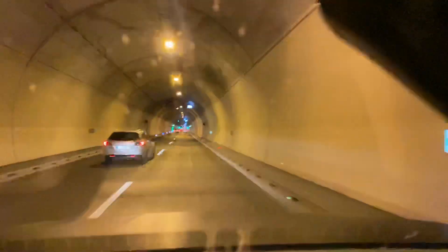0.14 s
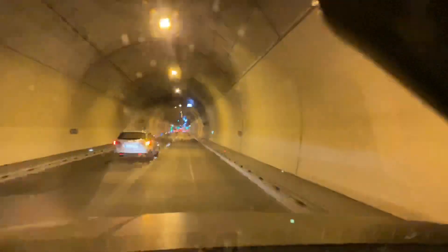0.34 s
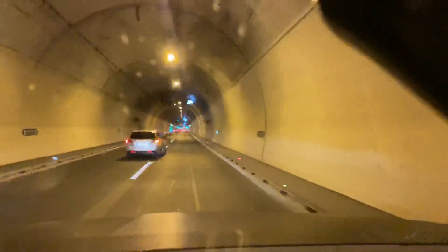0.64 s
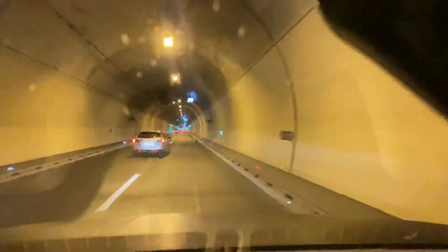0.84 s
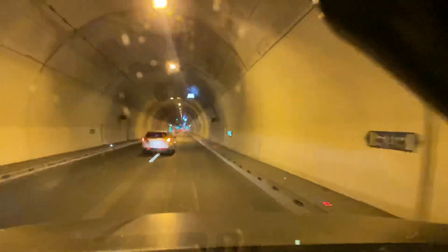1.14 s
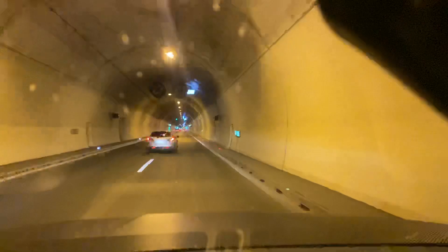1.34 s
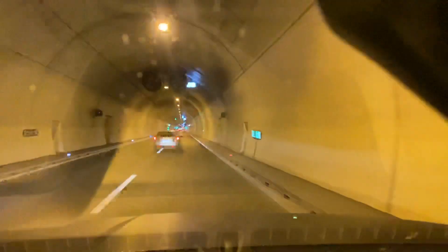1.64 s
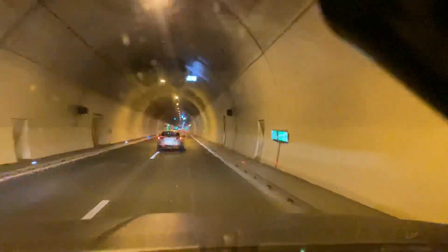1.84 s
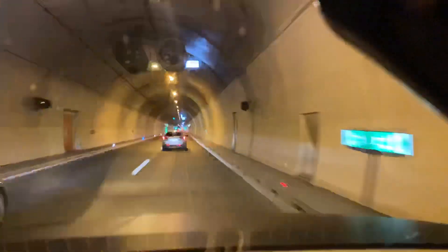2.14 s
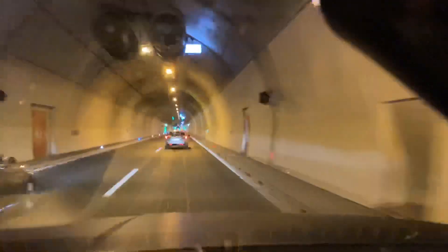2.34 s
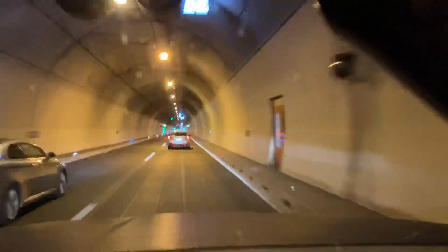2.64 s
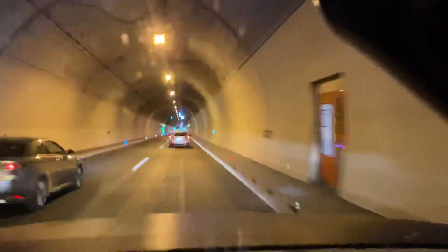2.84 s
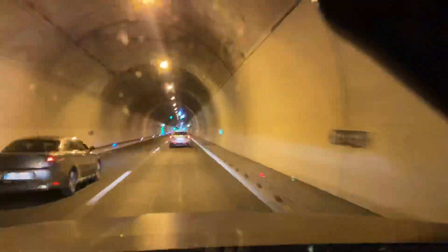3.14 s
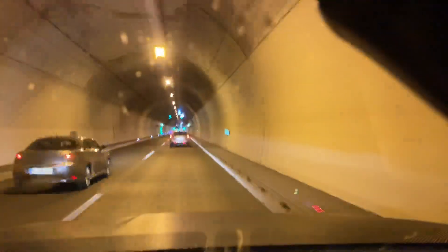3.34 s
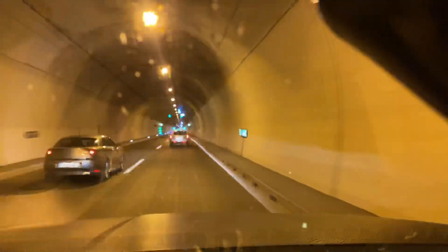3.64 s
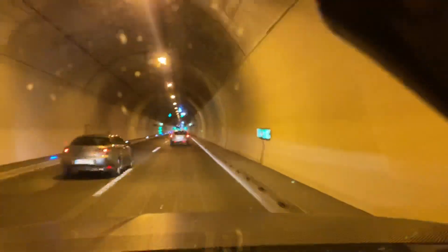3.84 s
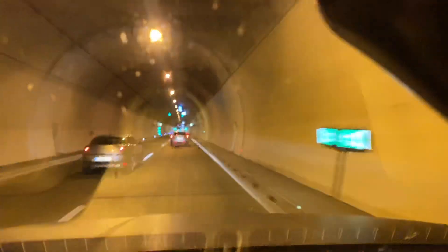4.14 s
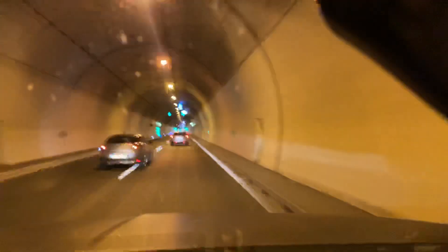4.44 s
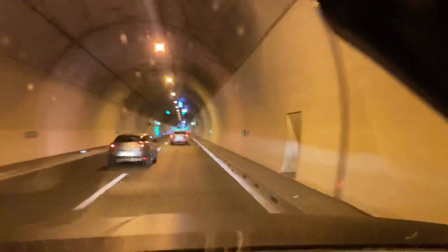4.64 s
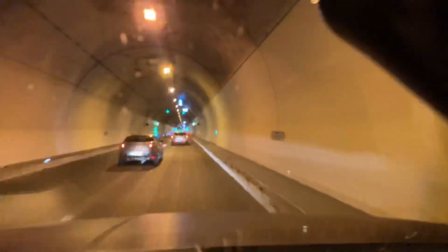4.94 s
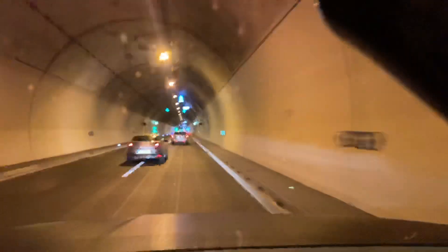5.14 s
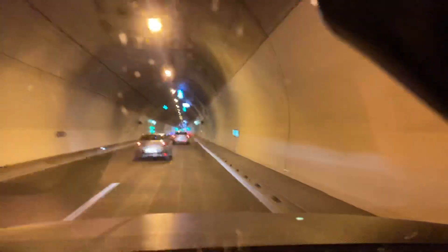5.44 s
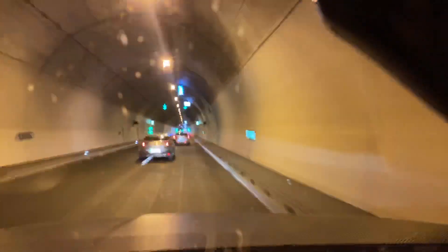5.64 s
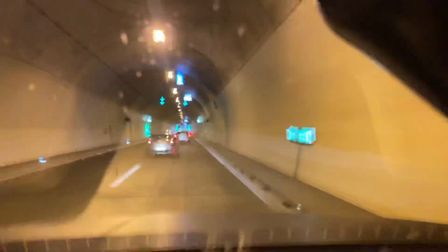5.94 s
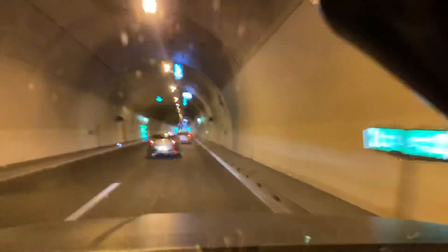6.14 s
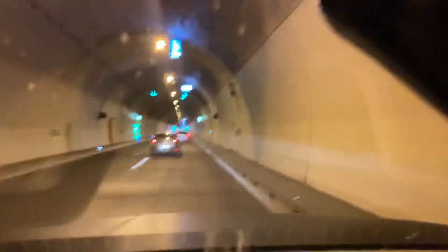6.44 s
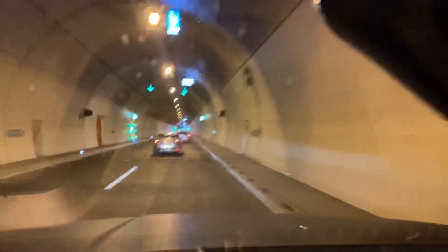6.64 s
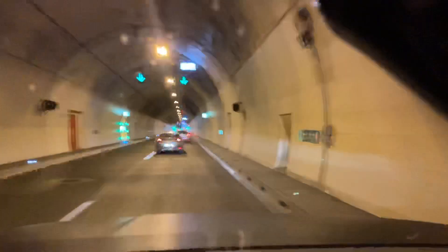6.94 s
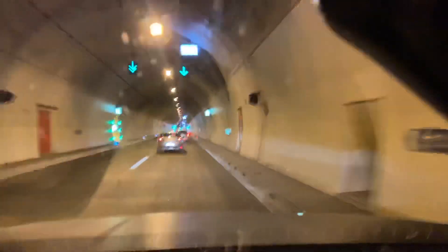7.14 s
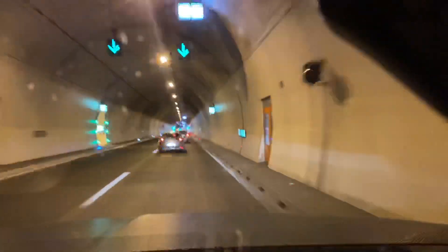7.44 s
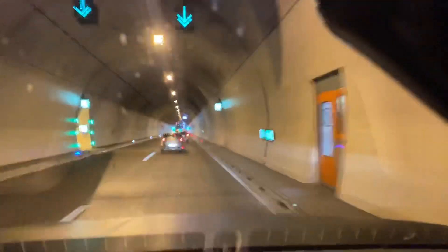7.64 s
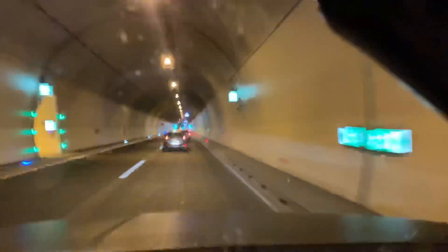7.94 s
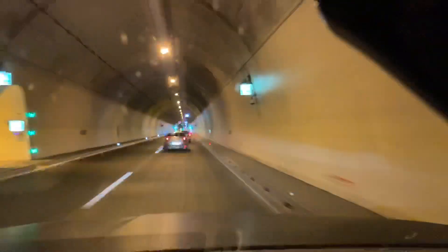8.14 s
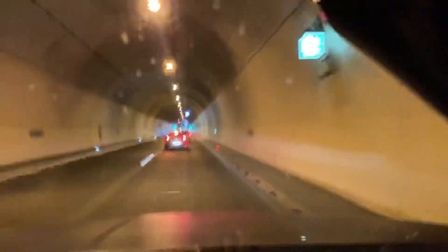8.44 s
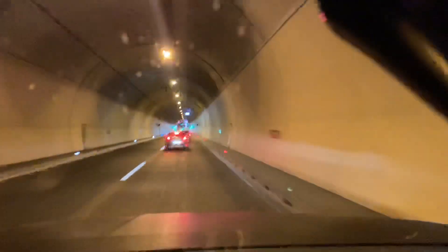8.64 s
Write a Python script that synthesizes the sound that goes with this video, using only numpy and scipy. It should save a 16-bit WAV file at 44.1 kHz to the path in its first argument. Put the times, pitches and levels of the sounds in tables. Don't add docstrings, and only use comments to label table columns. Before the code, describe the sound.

Inside a car in a road tunnel, a low engine drone sinks in pitch and throbs over steady tyre roar, rumble and airy hiss.

```python
import sys
import numpy as np
from scipy import signal
from scipy.fft import rfft, irfft, next_fast_len
from scipy.io import wavfile
from scipy.ndimage import uniform_filter1d, map_coordinates

SR = 44100
rng = np.random.default_rng(int(sys.argv[2]) if len(sys.argv) > 2 else 0)


def to_wav(sig):
    pcm = np.clip(np.atleast_2d(sig), -1, 1) * 32767
    pcm = np.round(pcm).astype(np.int16)
    wavfile.write(sys.argv[1], SR, pcm.T)


def amplitude_ratio(level_db):
    exponent = np.asarray(level_db, float) / 20
    return 10 ** exponent


N = 388521


def unit(x):
    return x / np.sqrt(np.mean(x ** 2) + 1e-20)


def along(points, hz, column=1):
    table = np.transpose(points)
    return np.interp(np.log(hz + 1), np.log(table[0] + 1), table[column])


def curves(rows):
    s, *cols = np.transpose(rows)
    return [np.interp(np.arange(N) / SR, s, c) for c in cols]


def wobble(rate):
    coarse = np.arange(0, N + 32, 32)
    knots = rng.standard_normal(int(N * rate / SR) + 4)
    return np.interp(np.arange(N), coarse, map_coordinates(knots, [coarse * rate / SR]))


def filtered(x, response):
    m = next_fast_len(N + SR // 2)
    return irfft(rfft(x, m) * response(np.fft.rfftfreq(m, 1 / SR)), m)[..., :N]


def rush(gain):
    m = next_fast_len(N)
    hz = np.fft.rfftfreq(m, 1 / SR)
    re, im = rng.standard_normal((2, 2, len(hz)))
    return unit(irfft((re + 1j * im) * gain(hz), m)[:, :N])


def patchy(pair, depth_db, speck_db=0):
    z = signal.stft(pair, nperseg=512)[2]
    grain = rng.standard_normal(z.shape[1:])
    patches = uniform_filter1d(uniform_filter1d(grain, size=4, axis=0), size=9, axis=1)
    specks = uniform_filter1d(grain[::-1], size=4, axis=1)
    gain = amplitude_ratio(depth_db * unit(patches) + speck_db * unit(specks))
    return unit(signal.istft(z * gain, nperseg=512)[1][:, :N])


def tone(hz, db, rough, rate):
    turn = 2 * np.pi * np.cumsum(hz) / SR
    in_phase = (1 + rough * wobble(rate)) * np.sin(turn)
    return amplitude_ratio(db) * unit(in_phase + rough * wobble(rate) * np.cos(turn))


def swells(rows):
    glide_s = .035
    null_share = 0.25
    null_left = 0.11
    s, hz, db = np.transpose(rows)
    t = np.arange(N) / SR
    k = np.clip(np.searchsorted(s, t) - 1, 0, None)
    ahead = np.append(s[1:], N / SR + glide_s)[k]
    half = null_share * (ahead - s[k])
    hump = np.tanh((t - s[k]) / half) * np.tanh((ahead - t) / half)
    hz, db = uniform_filter1d(np.array([hz[k], db[k]]), size=int(glide_s * SR))
    return hz, amplitude_ratio(db) * (null_left + (1 - null_left) * hump)


def spread(x, echo=.4):
    return np.array([x, echo * np.roll(x, SR // 8)])


def cabin(hz, base_db=-5):
    # f/Hz, width/Hz, level/dB
    modes = [(275, 13, -4), (437, 184, 6.5), (498, 110, -2.5), (571, 57, 4), (612, 64, 1), (723, 190, 0.5),
             (867, 134, 2.5), (955, 98, 4), (1064, 78, -2.5), (1214, 115, -4), (1356, 180, -7.5),
             (1600, 84, 2)]
    peaks = sum(amplitude_ratio(2 * db) / (1 + (2 * (hz - c) / w) ** 2) ** 2 for c, w, db in modes)
    return np.sqrt(amplitude_ratio(2 * base_db) + peaks)


def engine(blur_hz=17):
    # t/s, f/Hz, effort level/dB
    revs = [(0, 160, -42), (.7, 157.4, -41), (1.4, 154, -53), (2.2, 152, -43), (2.8, 149.2, -29.5),
            (3.4, 144.3, -35), (4, 140.2, -31), (4.6, 135.9, -43), (5, 130, -40), (6.3, 129.1, -41),
            (7, 131.6, -53), (7.8, 127.3, -56), (8.81, 127.8, -38)]
    # multiple of the firing rate, level/dB
    overtones = [(2, -13), (3, -7), (5, -10)]
    # t/s of the null, f/Hz and level/dB of the swell after it
    beats = [(-0.05, 159, -32.5), (0.403, 160.5, -30.5), (0.548, 158.1, -29), (0.637, 153.5, -29.5),
             (0.756, 153.3, -30), (0.895, 151.3, -28), (1.07, 155.8, -27.5), (1.213, 154.6, -24.7),
             (1.493, 152.4, -33), (1.598, 154.5, -31), (1.699, 149.5, -27), (1.894, 152.4, -26.5),
             (2.086, 148, -31.5), (2.222, 152.6, -28), (2.374, 149.4, -36), (2.563, 142.1, -50),
             (2.628, 148.2, -27.5), (2.919, 142.4, -23.4), (3.093, 150.2, -29.5), (3.189, 145.1, -22.5),
             (3.361, 144.6, -26.5), (3.59, 140.2, -26), (3.741, 144, -18), (3.845, 140, -18.5),
             (3.968, 138.9, -23.5), (4.135, 138.5, -23.5), (4.409, 136.3, -21), (4.561, 129.9, -22.5),
             (4.797, 133, -18), (4.919, 131, -16.5), (5.104, 137.7, -23), (5.167, 127.9, -18),
             (5.284, 127.4, -17), (5.386, 128.5, -16), (5.495, 130.9, -15.5), (5.644, 127.8, -17.5),
             (5.87, 124, -18.5), (6.01, 135, -19), (6.119, 130.2, -17), (6.285, 124.6, -18.5),
             (6.403, 139.2, -17.5), (6.472, 144.2, -23), (6.598, 127.2, -18), (6.689, 128.2, -16.5),
             (6.783, 137, -24.5), (6.95, 136.2, -17), (7.08, 131.3, -28), (7.171, 131.1, -20),
             (7.33, 126, -21.5), (7.455, 137.8, -18.5), (7.544, 124.8, -16.5), (7.718, 125.1, -20),
             (7.813, 142, -22), (7.874, 127.3, -18), (7.98, 124, -19.5), (8.22, 123.8, -20.5),
             (8.365, 132.8, -22.5), (8.47, 127.7, -21.5), (8.6, 130, -22.5), (8.72, 128.3, -24.5)]
    hz, effort_db = curves(revs)
    turn = 2 * np.pi * np.cumsum(hz) / SR

    def order(k):
        cosine = wobble(k * blur_hz) * np.cos(k * turn)
        sine = wobble(k * blur_hz) * np.sin(k * turn)
        return amplitude_ratio(2.5 * wobble(6)) * (cosine + sine)

    stack = np.array([sum(amplitude_ratio(db) * order(k) for k, db in overtones) for _ in range(2)])
    beat_hz, gain = swells(beats)
    firing = gain * tone(beat_hz, db=.1, rough=.12, rate=25)
    panel = gain * tone(np.full(N, 146.6), db=-10.5, rough=1.0, rate=20)
    return filtered(amplitude_ratio(effort_db) * stack, cabin) + spread(firing + panel)


def orders():
    # t/s of the null, then f/Hz, level/dB
    third = [(-0.05, 446, -20.5), (0.049, 485, -21.5), (0.115, 466, -24), (0.203, 486, -27),
             (0.27, 461, -24), (0.334, 433, -28), (0.386, 455.6, -24), (0.472, 460.9, -22),
             (0.62, 458, -28), (0.697, 457.4, -27.1), (0.805, 456.5, -24.5), (0.876, 456.9, -20.5),
             (0.959, 460.3, -24.5), (1.112, 474, -28), (1.258, 466, -30), (1.326, 444.5, -29),
             (1.398, 463.7, -28), (1.569, 450.5, -30.3), (1.696, 482, -30.4), (1.785, 431, -25.5),
             (1.886, 460.7, -21.5), (1.945, 461, -27.3), (2.01, 481, -36), (2.068, 463.0, -25.3),
             (2.153, 449.7, -24), (2.211, 458.4, -26.4), (2.306, 457.3, -32), (2.356, 453, -28),
             (2.427, 477, -29.2), (2.485, 442, -27.7), (2.542, 452, -31), (2.69, 456.6, -32),
             (2.766, 460, -27.6), (2.866, 435, -23), (3.026, 443.2, -21.5), (3.159, 452.6, -29),
             (3.325, 421.9, -23), (3.415, 433, -24), (3.51, 442.1, -31), (3.568, 437, -26),
             (3.653, 438, -32), (3.743, 433, -22), (3.819, 430.7, -36.5), (3.948, 418.6, -25),
             (4.055, 415.9, -22), (4.112, 406.4, -23), (4.165, 410.5, -37), (4.277, 410, -27),
             (4.372, 428.5, -30.9), (4.446, 417.2, -23.5), (4.524, 413.6, -29.2), (4.601, 415.2, -29),
             (4.692, 441, -29), (4.788, 424, -28), (4.858, 419.9, -33), (4.928, 404.4, -30),
             (5.054, 434.7, -34), (5.103, 441, -27), (5.2, 434.2, -55)]
    # t/s of the null, then f/Hz, level/dB
    fourth = [(-0.05, 578, -55), (2.7, 570, -34), (2.742, 594, -31), (2.832, 573.4, -36),
              (2.91, 590.2, -30), (2.991, 574.7, -44), (3.042, 567.7, -27), (3.149, 573.2, -35),
              (3.241, 563.4, -28), (3.321, 567.7, -40), (3.38, 573.1, -36), (3.478, 559.6, -27),
              (3.684, 572.3, -26), (3.755, 565.1, -22.5), (3.882, 583.0, -34), (3.943, 562.2, -26),
              (4.013, 563.9, -33), (4.157, 573.5, -24), (4.242, 550.8, -36), (4.31, 572.8, -23),
              (4.36, 571, -27), (4.484, 557.2, -42), (4.575, 569.5, -34), (4.672, 568.7, -34),
              (4.763, 567.3, -40), (4.86, 566.1, -35), (4.954, 564.1, -35), (5.0, 560, -63)]
    both = 0
    for hz, gain in map(swells, (third, fourth)):
        both = both + gain * tone(hz, db=1, rough=.5, rate=33)
    return spread(both)


def boom():
    # t/s of the null, then f/Hz, level/dB
    bumps = [(-0.05, 64.3, -31), (0.17, 61, -25.5), (0.314, 62.4, -26), (0.488, 60.65, -28.8),
             (0.563, 62.8, -31), (0.642, 62, -30.5), (0.72, 65, -32), (0.818, 64.3, -30.5),
             (0.99, 58.4, -32), (1.123, 61.7, -29), (1.217, 65.94, -29), (1.399, 61.4, -28),
             (1.532, 60.8, -33), (1.62, 63.05, -30), (1.752, 61.2, -31), (1.865, 65.3, -28),
             (1.946, 67.75, -27), (2.129, 60.5, -33), (2.286, 59.9, -29.7), (2.416, 62.55, -30),
             (2.574, 64.3, -26), (2.68, 66.15, -28.5), (2.841, 61.3, -27), (3.004, 62.4, -32.5),
             (3.342, 61.47, -32), (3.454, 61.55, -30), (3.663, 61.75, -26.5), (3.925, 63.33, -32),
             (4.078, 63.56, -34), (4.148, 60.6, -34.3), (4.251, 58.7, -45), (4.401, 65.2, -37),
             (4.513, 63.3, -26.5), (4.729, 62.7, -28), (4.864, 63.34, -32), (5.042, 63.9, -27),
             (5.384, 64, -25.5), (5.636, 63.8, -25), (5.826, 62.6, -23), (6.09, 61.9, -27),
             (6.244, 64.5, -24.5), (6.448, 63.7, -25.5), (6.631, 65.5, -26), (6.783, 65.2, -22.5),
             (6.993, 64.6, -29), (7.191, 63.5, -26.5), (7.361, 65.25, -25.5), (7.61, 63, -22.5),
             (7.716, 65.2, -22.5), (8.096, 63.5, -23.5), (8.235, 63.6, -24), (8.379, 65.15, -30),
             (8.509, 65.66, -29.5), (8.677, 59.6, -21.5)]
    hz, gain = swells(bumps)
    drift_hz = 0.72 * wobble(6)
    return spread(gain * tone(hz + drift_hz, db=.2, rough=.12, rate=18))


def road():
    # t/s, tyre roar level/dB
    coarseness = [(0, -30), (.4, -30), (.9, -29.5), (1.7, -30.5), (3.6, -29.5), (6.1, -29.5), (7.9, -29),
                  (8.81, -29)]
    # f/Hz, level/dB
    rumble_colour = [(10, -43), (22, -12), (40, -6), (50, 1.5), (56, -8.5), (70, -6), (85, -14), (108, -2),
                     (125, -4), (140, -2.5), (160, -2.5), (175, -3.5), (200, -8.5), (260, -10.5),
                     (330, -13.5), (450, -46), (700, -120)]
    # f/Hz, level/dB
    roar_colour = [(120, -120), (250, -7), (330, -7), (500, -3.5), (800, -3), (1000, -3), (1300, -2.5),
                   (1700, -11.5), (2200, -23.5), (3000, -61), (5000, -120)]
    roar_db, = curves(coarseness)
    rumble_db = -27 + 0.84 * (roar_db - roar_db.mean())
    rumble = amplitude_ratio(rumble_db) * rush(lambda hz: amplitude_ratio(along(rumble_colour, hz)))
    tyres = rush(lambda hz: amplitude_ratio(along(roar_colour, hz)) * cabin(hz))
    return rumble + amplitude_ratio(roar_db + 6.0) * patchy(tyres, depth_db=1.2)


def wind():
    # t/s, level/dB
    gusts = [(0, 3.5), (.45, 5), (.75, 8), (1.1, 5.5), (1.5, 2), (1.85, -3), (2.2, 0.5), (3, 4), (4, 1.5),
             (5.3, 3.5), (6.2, 4), (7.2, 3), (8.1, 3.5), (8.81, 1)]
    # f/Hz, level/dB
    hiss_colour = [(600, -120), (1000, -6.5), (1400, -4), (1650, -8.5), (1780, -5.5), (2000, -10),
                   (2130, -7), (2320, -15), (2440, -13.5), (2700, -15.5), (3500, -19.5), (4500, -25),
                   (5250, -25.5), (5480, -28.5), (5700, -28), (6300, -27), (7500, -36.5), (9500, -41),
                   (12000, -120)]
    # f/Hz, level/dB
    sizzle_colour = [(4000, -120), (6000, -20), (7500, -1), (9300, -5), (10500, -6), (12200, -11),
                     (12600, -12), (13500, -8), (14500, -14), (15100, -16.5), (15400, -26), (15800, -36)]
    # f/Hz, level/dB
    swish_colour = [(1500, -120), (2000, -6), (2200, 0), (2600, -8), (3100, -3), (3700, -2), (4100, -12),
                    (6000, -120)]
    air_db, = curves(gusts)

    hiss = patchy(rush(lambda hz: amplitude_ratio(along(hiss_colour, hz))), depth_db=0.45, speck_db=2.0)
    hiss = amplitude_ratio(-35 + 0.15 * air_db + 0.49 * wobble(6.5)) * hiss

    sizzle = patchy(rush(lambda hz: amplitude_ratio(along(sizzle_colour, hz))), depth_db=1.2, speck_db=4.5)
    sizzle = amplitude_ratio(-64.5 + air_db + wobble(14)) * sizzle

    swish_gain = (amplitude_ratio(-60 + air_db) + niches()) * amplitude_ratio(wobble(15))
    swish = swish_gain * rush(lambda hz: amplitude_ratio(along(swish_colour, hz)))
    return hiss + sizzle + swish


def niches():
    # t/s, peak level/dB, release/s
    passed = [
        (6.235, -43, 0.058),
        (6.75, -48, .15),
        (7.1, -42, 0.16),
        (7.57, -40.5, 0.14),
    ]
    attack_s = .022
    s, db, release_s = np.transpose(passed)[:, :, None]
    late = np.arange(N) / SR - s
    slope = np.where(late < 0, late / attack_s, -late / release_s)
    return np.sum(amplitude_ratio(db) * np.exp(slope), axis=0)


def traffic():
    # t/s, low drone level/dB, high drone level/dB
    drones = [(0, -35.5, -44), (1, -30, -50), (1.7, -42, -43), (3, -56, -38), (4.2, -37, -47),
              (5, -45, -33.5), (5.7, -40, -32), (6.4, -39, -33), (7.2, -29, -49), (7.8, -27.5, -36),
              (8.4, -37, -40), (8.81, -35, -30)]
    # f/Hz, width/Hz
    treads = [
        (640, 152),
        (920, 190),
    ]

    def drone(c, w):
        return patchy(rush(lambda hz: cabin(hz) / (1 + (2 * (hz - c) / w) ** 4)), depth_db=2.0)

    return sum(amplitude_ratio(db) * drone(c, w) for db, (c, w) in zip(curves(drones), treads))


def hum():
    # t/s, level/dB
    exhaust = [(0, -30), (.6, -28.5), (1.3, -34.5), (1.9, -47), (2.2, -27), (2.9, -52), (3.4, -47),
               (4.3, -36.5), (5, -47), (5.6, -35), (6.2, -35), (6.75, -29), (7.2, -29), (7.6, -27.5),
               (8.2, -32), (8.81, -30)]
    hum_hz, width_hz = 106.2, 63

    def band(hz, k):
        return 1 / (1 + (2 * (hz - k * hum_hz) / (k * width_hz)) ** 4)

    return amplitude_ratio(curves(exhaust)[0]) * rush(lambda hz: band(hz, 1) + amplitude_ratio(-5) * band(hz, 1.94))


def ticks():
    # t/s, peak level/dB
    snaps = [
        (6.2245, -38.5),
        (6.2696, -53),
    ]
    out, t = np.zeros(N), np.arange(SR // 50) / SR
    for s, db in snaps:
        burst = amplitude_ratio(db + 7 - 60 * t / .008) * rng.standard_normal(len(t))
        out[round(s * SR):][:len(t)] += burst
    bright = filtered(out, lambda hz: 1 / (1 + (6500 / (hz + 1)) ** 4) / (1 + (hz / 15000) ** 8))
    return bright * [[1], [0]]


def ports(field):
    # f/Hz, likeness 0-1, left lag/rad, left-right level/dB
    pair = [(30, .95, 0, -1.7), (65, .9, 0, -1.7), (87, .5, .2, -.5), (125, .92, .45, 0),
            (175, .75, 1.4, 2), (220, .7, .5, 3), (290, .7, 1.1, -1.5), (380, .7, 2.4, 1),
            (550, .65, 2.3, 2), (650, .92, 2.8, 2), (770, .77, 2.55, 2.3), (860, .96, 2.9, .5),
            (970, .95, 3.1, 1.8), (1050, .7, 2.5, 2), (1150, .8, 2.8, 2), (1270, .45, 2.3, 3),
            (1400, .5, 2.7, 3), (1800, .3, 2.2, .7), (2150, .4, .5, 2), (3500, .25, 1.2, 2),
            (4600, .35, 0, 1.3), (5800, .3, -3, 1), (7000, .65, 0, -.3), (7500, .1, 1, -.5),
            (7900, .55, 3.1, -.5), (8800, .56, 2.8, -.2), (10300, .88, .7, 0), (11500, .9, -.4, 0),
            (12200, .92, -1.5, 0), (12500, .92, -2.7, 0), (14000, .92, -3.5, 0), (14500, .9, -4.1, 0),
            (15200, .85, -5.5, 0)]

    def shares(hz):
        angle = np.arccos(np.clip(along(pair, hz), 0, 1)) / 2
        return np.array([np.cos(angle), np.sin(angle)])

    def left_and_right(hz):
        half = amplitude_ratio(along(pair, hz, column=3) / 2) * np.exp(-.5j * along(pair, hz, column=2))
        return np.array([half, 1 / half])

    common, apart = filtered(field, shares)
    return filtered(np.array([common + apart, common - apart]), left_and_right)


def scene():
    car = engine() + orders() + boom() + road() + wind()
    return ports(car + traffic() + hum() + ticks())


def roll_off(x):
    return signal.sosfilt(signal.butter(12, 15700, fs=SR, output="sos"), x)


def record(dry):
    return roll_off(dry)


dry = scene()
out = record(dry)
to_wav(out)
```